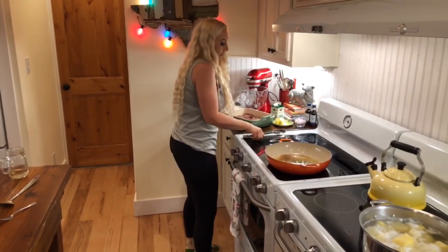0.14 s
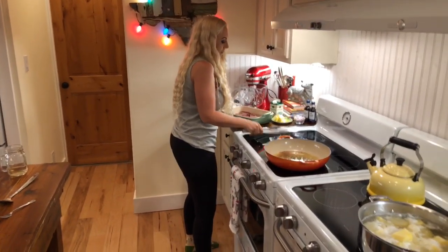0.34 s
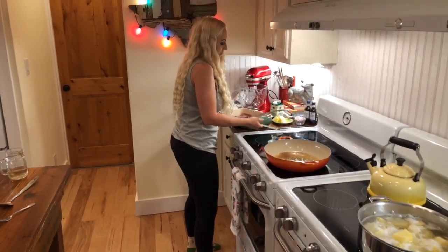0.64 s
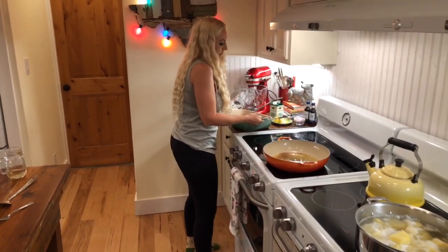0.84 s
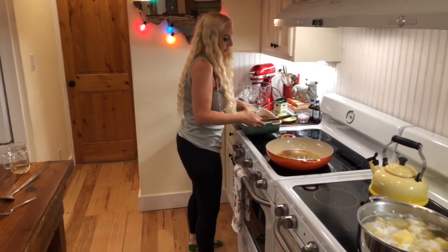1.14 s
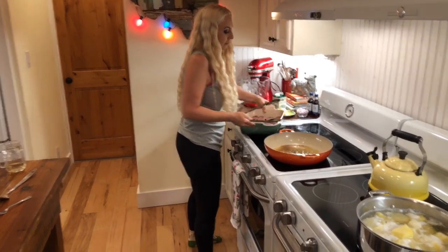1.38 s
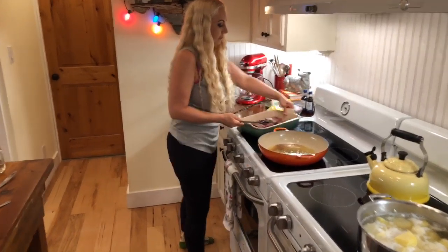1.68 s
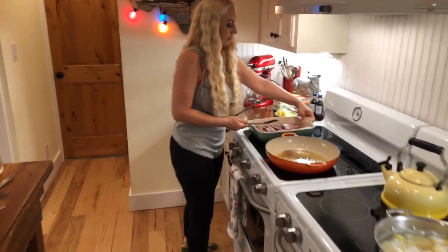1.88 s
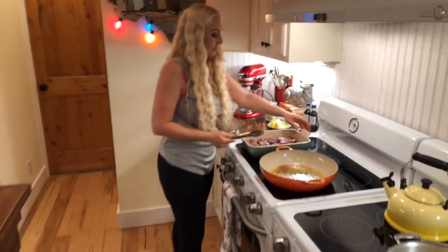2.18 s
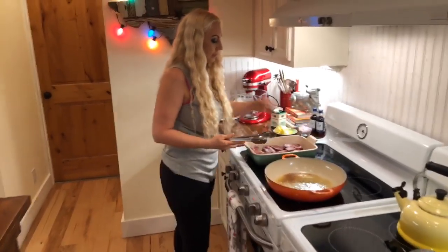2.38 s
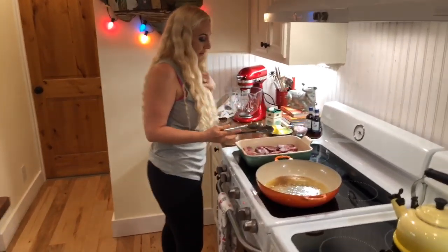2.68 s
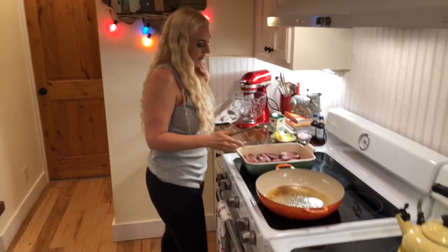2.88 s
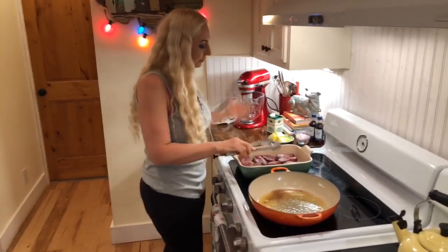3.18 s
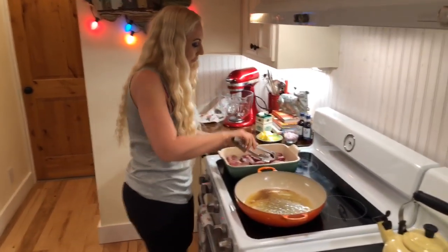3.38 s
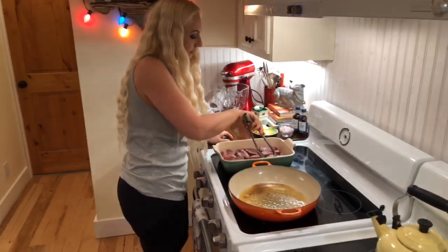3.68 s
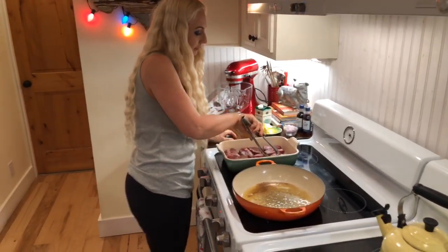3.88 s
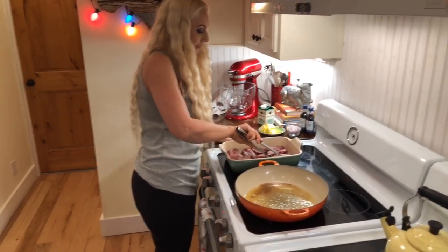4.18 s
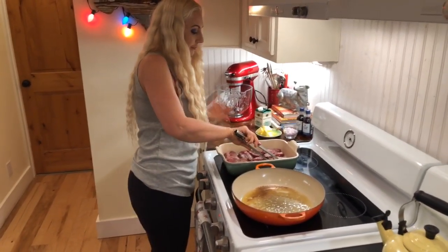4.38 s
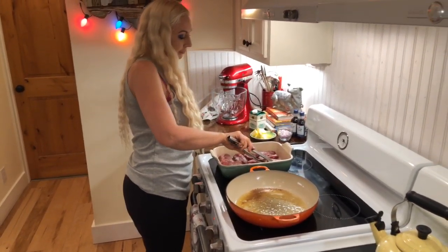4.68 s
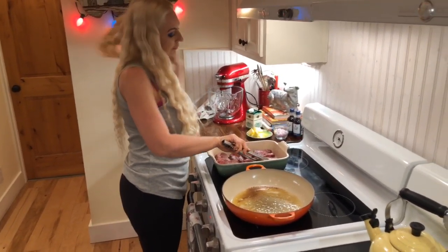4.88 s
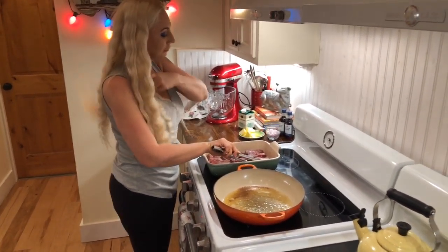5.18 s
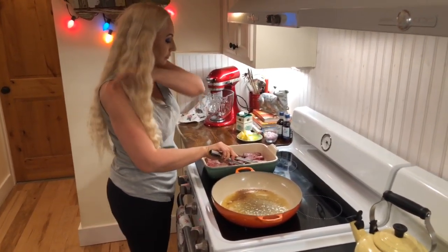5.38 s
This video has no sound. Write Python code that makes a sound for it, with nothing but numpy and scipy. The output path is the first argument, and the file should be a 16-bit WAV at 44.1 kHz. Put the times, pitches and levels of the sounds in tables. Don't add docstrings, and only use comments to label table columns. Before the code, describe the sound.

In a quiet home kitchen with a low hum, steel tongs clatter as they are picked up, a stoneware dish grinds along the counter and knocks down heavily with low thuds. A cup and cutlery chink, then tongs click, spring and snap hard on the dish, followed by faint ticks and rustling. A hand-held microphone catches short indoor echoes and low handling rumble.

```python
import sys
import numpy as np
from scipy import signal
from scipy.fft import rfft, irfft, next_fast_len
from scipy.io import wavfile

SR = 44100
rng = np.random.default_rng(int(sys.argv[2]) if len(sys.argv) > 2 else 0)


def gain_from_db(level_db):
    decades = np.asarray(level_db, float) / 20
    return 10 ** decades


def store_pcm(level_fs):
    pcm = np.round(np.clip(level_fs, -1, 1) * 32767).astype(np.int16)
    wavfile.write(sys.argv[1], SR, np.atleast_2d(pcm).T)


N = 244622

# (time [s], level [dB], crack against ring [dB], favoured pitch [Hz], its level [dB])
TONG_CLICKS = [
    (3.1232, -45, -11, 7300, -5),
    (3.2665, -65.5, -5, 5360, -8),
    (3.4311, -45, -11, 4800, -10.5),
    (3.5917, -47, -8.5, 7060, -1.5),
]
# (pitch [Hz], level [dB], time to fall 60 dB [s])
TONGS = [(4730, -6, .2), (4960, -1, .25), (5790, 0, .3), (7060, -9, .12), (5550, -9, .15), (8200, -11, .2),
         (9170, -12, .12), (9890, -12, .15), (10500, -13, .08), (11220, -13, .08), (11690, -12, .07),
         (12680, -12, .1), (13200, -12, .07), (14550, -15, .08)]
# (frequency [Hz], level [dB per Hz])
STEEL_CRACK = [(1060, -50), (1800, -15), (3060, -8), (3320, -6), (4140, -6.5), (4790, 9.5), (5250, 5.5),
               (5640, 6.5), (6470, -3.5), (7160, 3.5), (7770, -5.5), (8910, -7), (11800, -8), (13100, -13),
               (15500, -17), (16200, -25)]


def tong_clicks():
    return struck(TONG_CLICKS, TONGS, STEEL_CRACK, bright_db=5.5, harder_db=1.0, best_db=-1.5,
                  ring_db=-12.5, spread_db=-1.0, split=0.004, crack_s=0.011, longest_s=0.1,
                  walls_db=-2.0, ring_tilt=0.1)


# (time [s], level [dB], crack against ring [dB], favoured pitch [Hz], its level [dB])
TONG_SPRINGS = [
    (3.3004, -45, -3.5, 4720, -8),
    (3.318, -48.5, -12, 5800, -6),
    (3.3877, -43.5, -1, 9300, -5.5),
    (3.3965, -55.5, -10, 7050, 4),
]
# (pitch [Hz], level [dB], time to fall 60 dB [s])
TONGS_FREE = [(5000, -5.5, .3), (5790, -5, .3), (6990, -7, .25), (7540, -21, 0.19), (8220, -8.5, .3),
              (9168, -14.5, .2), (9870, -10.5, .25), (10530, -12, .1), (10950, -12, .12), (11480, -14, .12),
              (12500, -15, .12), (13100, -13, .1), (14550, -17, 0.097), (15300, -26, 0.1006)]


def tong_springs():
    return struck(TONG_SPRINGS, TONGS_FREE, STEEL_CRACK, bright_db=6.5,
                  ring_db=-11.5, spread_db=0.0, split=0.0045, crack_s=0.0049, longest_s=0.22,
                  walls_db=-0.5, ring_tilt=0.11)


# (time [s], level [dB], crack against ring [dB], favoured pitch [Hz])
TONG_SNAPS = [
    (3.4805, -28.5, -11.5, 5950),
    (3.5244, -49, -3, 5760),
]
# (pitch [Hz], level [dB], time to fall 60 dB [s])
TONGS_GRIPPED = [(4807, 2, 0.24), (5250, -20, 0.31), (5680, -22, 0.19), (5760, -8, 0.21), (6200, -24, 0.24),
                 (6390, -9.5, 0.19), (7060, -25, 0.39), (8230, -13, 0.1), (9076, -22, 0.43),
                 (10060, -7, 0.0378), (11300, -13, 0.1), (12220, -15, 0.25), (12360, -13, 0.12),
                 (13610, -16.5, 0.18)]


def tong_snaps():
    return struck(TONG_SNAPS, TONGS_GRIPPED, STEEL_CRACK, bright_db=3.0, best_db=-3,
                  ring_db=-15.5, spread_db=3.5, split=0.0024, crack_s=0.0056, longest_s=0.072,
                  walls_db=-0.5, ring_tilt=0.05)


# (time [s], level [dB], crack against ring [dB], favoured pitch [Hz])
JAW_ON_RIM = [
    (3.48, -41.5, -2.5, 2038),
]
JAW_REBOUND = [
    (3.592, -44.5, -6, 856),
]
# (pitch [Hz], level [dB], time to fall 60 dB [s])
RIM_STRUCK = [(622, -19, .2), (891, -3.5, 0.093), (1093, -9, .12), (1578, -2, .12), (1940, -8, .04),
              (2050, -3.5, 0.051), (2200, -11.5, .1), (2420, -3, 0.099), (2573, -22, 0.14),
              (2772, -20, .15)]
RIM_REBOUND = [(818, -6, 0.15), (874, -3, .16), (1187, -7.5, 0.19), (1340, -7, 0.12), (1693, -4, .12),
               (1830, -16, .15), (2030, -9, .12), (2300, -10, 0.13), (2760, -28, .1), (2900, -29, .1)]
# (frequency [Hz], level [dB per Hz])
JAW_CRACK = [(300, -39.5), (620, -22), (850, 4), (1300, -2.5), (2070, 0.5), (2600, -11), (4000, -16),
             (6000, -59)]


def jaw_on_rim():
    return sum(struck(taps, rim, JAW_CRACK, bright_db=-1.0, best_db=-7.5,
                      ring_db=-11.0, spread_db=3.0, split=0.011, crack_s=0.0058, longest_s=0.16,
                      walls_db=0.5)
               for taps, rim in ((JAW_ON_RIM, RIM_STRUCK), (JAW_REBOUND, RIM_REBOUND)))


# (time [s], level [dB], crack against ring [dB], favoured pitch [Hz], its level [dB])
TONG_TICKS = [
    (3.8008, -68, -7, 5700, -8),
    (3.925, -68.5, -2.5, 4800, -15),
    (3.982, -64, -9, 4970, -8),
    (3.9883, -58.5, -1, 5160, -9),
    (4.127, -73, -4, 5250, -5),
    (4.268, -69, -9, 5200, -1),
    (4.3245, -52.5, -9.5, 5500, 0),
]
# (pitch [Hz], level [dB], time to fall 60 dB [s])
TONGS_DAMPED = [(4820, -8, 0.19), (5240, -7, 0.096), (5600, -6, 0.096), (5981, -23, 5.0), (6880, -21, 0.17),
                (7682, -31, 5.0), (9400, -20, 0.12), (10560, -14, 0.074)]


def tong_ticks():
    return struck(TONG_TICKS, TONGS_DAMPED, STEEL_CRACK, bright_db=0.0,
                  ring_db=-17, spread_db=2.5, split=0.0037, crack_s=0.0039, longest_s=0.085,
                  walls_db=-1, ring_tilt=0.1)


# (time [s], level [dB], crack against ring [dB], favoured pitch [Hz])
TONG_PICKUP = [
    (0.2264, -68, -15, 5340),
    (0.2483, -54, -7, 6660),
    (0.3257, -62, -24, 4670),
    (0.3785, -47, -2, 5240),
    (0.3914, -49, -4, 4860),
    (0.3995, -46, -10, 5330),
    (0.4494, -55, -23, 8450),
]
# (pitch [Hz], level [dB], time to fall 60 dB [s])
TONGS_LYING = [(4748, -4, 0.24), (5000, 3, 0.34), (5320, -6, 0.2), (6460, -9, 0.86), (6800, -24, 0.47),
               (7470, -15, 0.19), (8500, -6, 0.93), (8600, -19, 0.23), (9700, -6, 0.3), (10300, -14, 0.17),
               (10500, -4, 0.1), (11220, -12, 0.18), (12880, -13, 0.19), (13370, -13, 0.2)]


def tong_pickup():
    return struck(TONG_PICKUP, TONGS_LYING, STEEL_CRACK, bright_db=10.0, best_db=-3.5,
                  ring_db=-17.5, spread_db=1.5, split=0.0023, crack_s=0.0064, longest_s=0.16,
                  walls_db=2.1, ring_tilt=0.1)


# (peak time [s], level [dB], rise [s], fall [s])
STEEL_SLIDE = [
    (0.272, -50.5, 0.039, 0.037),
    (0.345, -56.5, 0.071, .08),
    (0.4, -54, 0.063, 0.097),
]
# (frequency [Hz], level [dB per Hz])
SLIDE_COLOUR = [(880, -59.5), (1500, -28.5), (1670, -1.5), (2230, -18), (2560, 0), (2770, -8.5),
                (4000, -6.5), (4870, 1.5), (6120, -8.5), (7170, -11), (7760, -11), (10900, -17),
                (16000, -21)]


def steel_slide():
    ticks = rng.standard_normal(N) * gain_from_db(4.9 * flicker(350))
    return gain_from_db(-6.5) * strokes(STEEL_SLIDE) * rms_one(shaped(ticks, SLIDE_COLOUR))


# (time [s], level [dB], crack against ring [dB], favoured pitch [Hz], its level [dB])
DISH_KNOCKS = [
    (1.502, -46, 4.5, 700, -16),
    (1.6137, -36.5, 8, 787, 6),
    (1.6758, -30, 1.5, 1196, -7.5),
    (1.7914, -32.5, 3, 2894, -2),
]
# (pitch [Hz], level [dB], time to fall 60 dB [s])
DISH = [(563, -29.5, 5.0), (838, 2, 0.33), (1110, 8, 0.24), (1250, -9, 0.12), (1530, -15, 1.4),
        (1860, -12, 0.26), (2226, -12, 0.1), (2470, -12, 0.16), (2670, 2.5, 0.14), (3170, -23.5, 1.1),
        (3386, -14.5, 0.52), (3380, 6, 0.028), (3420, -8, 0.19), (4240, 7, 0.0245)]
DISH_ROCKING = [(380, -12, 1.4), (656, -25.5, 0.23), (867, -4.5, 0.18), (1140, -4, 0.206),
                (1235, -22.5, 1.1), (1670, -6, 0.048), (2320, -22, 0.45), (2470, -24, 5.0),
                (2643, -14.5, 0.51), (2880, -24.5, 0.32), (3040, -11.5, 0.4), (3250, -27, 1.5),
                (3690, -28, 0.28), (4340, -29.5, 0.28)]
DISH_FLAT = [(410, 1, 0.66), (473, -20, 0.65), (562, 1, 0.35), (858, -4.5, 0.79), (1112, -2.5, 0.17),
             (1322, -4.5, 0.29), (1669, -13.5, 0.25), (1880, -21, 5.0), (2700, -19.5, 0.15),
             (2480, -6.5, 0.13), (2826, -18, 0.5), (2923, -22, 1.0), (3320, -7, 0.28), (4300, -26, 0.34)]
# (frequency [Hz], level [dB per Hz])
DISH_CRACK = [(76, -20.5), (150, -1.5), (270, -9.5), (881, -2.5), (1140, -2), (2090, -9.5), (2610, -6.5),
              (4070, -11.5), (12800, -36.5), (15100, -43.5), (16000, -72)]


def dish_knocks():
    landings = ((DISH_KNOCKS[:2], DISH), (DISH_KNOCKS[2:3], DISH_ROCKING), (DISH_KNOCKS[3:], DISH_FLAT))
    return sum(struck(knocks, dish, DISH_CRACK, bright_db=-3.0, harder_db=0.33,
                      ring_db=-18.5, spread_db=2.0, split=0.008, crack_s=0.0074, longest_s=0.22,
                      walls_db=-2.1, ring_tilt=0.088)
               for knocks, dish in landings)


# (time [s], level [dB], crack against ring [dB], favoured pitch [Hz])
RIM_TAPS = [
    (0.272, -56.5, 1.5, 452),
    (0.387, -54.5, -7, 2690),
    (2.061, -63, 7.5, 720),
    (3.985, -69.5, -0.5, 2300),
    (4.324, -65.5, 0, 2050),
]
DULL_BUMPS = [
    (0.79, -60, -14, 870),
    (0.895, -57, -7, 860),
    (1.0, -57, -10, 1550),
    (1.02, -56, -15, 860),
    (1.055, -57, -18, 866),
    (1.131, -52, -10.5, 794),
    (1.434, -62, -2, 765),
]
# (pitch [Hz], level [dB], time to fall 60 dB [s])
RIM = [(617, -4.5, 0.15), (634, -42, 0.67), (860, -9, 0.17), (877, -4.5, 0.21), (1180, -20, 0.25),
       (1180, -3.5, 0.36), (1708, -4.5, 0.28), (2050, 1, 0.12), (2270, 6, 0.2), (2700, -33, 0.17)]
# (frequency [Hz], level [dB per Hz])
RIM_CRACK = [(180, -34), (300, -6), (648, -14), (831, 3), (978, 0.5), (2070, -6), (4000, -16.5),
             (5200, -71), (8800, -120)]


def rim_taps():
    return sum(struck(taps, RIM, RIM_CRACK, bright_db=bright_db, best_db=best_db,
                      ring_db=-29.0, spread_db=6.5, split=0.02, crack_s=0.0068, longest_s=0.3,
                      walls_db=-0.2)
               for taps, bright_db, best_db in ((RIM_TAPS, 2.1, -2.0), (DULL_BUMPS, -4, -3.5)))


# (time [s], level [dB])
DRAG = [
    (0.121, -80.5),
    (0.27, -67),
    (0.304, -60.5),
    (0.43, -72),
    (0.76, -65),
    (0.87, -65),
    (1.04, -61.5),
    (1.13, -79.5),
    (1.28, -88.5),
]
# (peak time [s], level [dB], rise [s], fall [s])
SETTLING = [
    (1.53, -59, 0.036, 0.79),
]
# (frequency [Hz], level [dB per Hz])
DRAG_COLOUR = [(47, -45.5), (80, 2.5), (177, -6.5), (358, -2.5), (535, -5), (837, -5), (1290, -11.5),
               (1580, -13), (2330, -25), (2500, -34), (3250, -60), (5500, -120)]
GRIT_COLOUR = [(900, -19.5), (1500, -4.5), (2500, -3), (4500, -11), (7000, -20.5)]


def drag():
    lumps = gain_from_db(2 * flicker(25) + 2.5 * flicker(150))
    grind = coloured(DRAG_COLOUR) * lumps
    body = sum(gain_from_db(level_db) * ring(grind, hz, 0.3) for hz, level_db, _ in RIM)
    grind = rms_one(rms_one(grind) + gain_from_db(-18.0) * rms_one(body))
    s, grind_db = np.transpose(DRAG)
    grit_db = -76.5 + 0.92 * (grind_db + 59.5)
    grit_gain = envelope(np.c_[s, grit_db]) + strokes(SETTLING)
    grit = grit_gain * coloured(GRIT_COLOUR) * lumps
    return gain_from_db(-4.0) * (envelope(DRAG) * grind + grit)


# (time [s], level [dB], crack against ring [dB], favoured pitch [Hz])
CUTLERY_CLICKS = [
    (2.2646, -42, -10.5, 3430),
    (2.2685, -41.5, -11, 8500),
    (2.2855, -56, -13, 5950),
    (2.377, -56, -2, 5800),
    (2.4967, -60, -2.5, 3330),
]
# (pitch [Hz], level [dB], time to fall 60 dB [s])
CUTLERY = [(4743, -9, .2), (4950, -5, .14), (5800, -3, .11), (6406, -4, .096), (8500, -4, .15),
           (7200, -7, .1), (9475, -4, .13), (10380, -8, .2), (10520, -3, .15), (11560, -3, .09),
           (11900, -14, .2), (5300, -11, .1), (13040, -9, .19), (13450, -9, .13)]
# (frequency [Hz], level [dB per Hz])
CUTLERY_CRACK = [(1060, -49), (1800, -29), (2300, -13), (3260, -16.5), (4100, -17), (4830, 3.5), (5290, -6),
                 (5850, -3), (7910, -8.5), (8280, -11.5), (10800, -10), (13400, -9.5), (16000, -29)]


def cutlery():
    return struck(CUTLERY_CLICKS, CUTLERY, CUTLERY_CRACK, bright_db=3.0, harder_db=0.56, best_db=-20,
                  ring_db=-19.5, spread_db=3.5, split=0.0048, crack_s=0.0036, longest_s=0.13,
                  walls_db=1.0, ring_tilt=0.14)


# (time [s], level [dB], crack against ring [dB], favoured pitch [Hz])
CUP_CHINK = [
    (2.0612, -46, -10.5, 4200),
]
# (pitch [Hz], level [dB], time to fall 60 dB [s])
CUP = [(4830, -21, 0.33), (3880, -11, 0.21), (4730, -23, 1.4), (5792, -23, 0.94), (6120, 0, 0.13),
       (6240, -25, 0.23), (7500, -18, 0.32), (9800, -28, 0.7)]
# (frequency [Hz], level [dB per Hz])
CUP_CRACK = [(1760, -39), (3000, -37), (4170, -3), (5110, -8), (6220, -7), (6440, -10), (8460, -24.5),
             (13100, -23), (16000, -53)]


def cup():
    return struck(CUP_CHINK, CUP, CUP_CRACK, bright_db=4.5, best_db=-15,
                  ring_db=-15.5, spread_db=-7.5, split=0.0076, crack_s=0.0082, longest_s=0.15,
                  walls_db=-1.0)


# (time [s], level [dB], crack against ring [dB], favoured pitch [Hz])
LIGHT_TAPS = [
    (4.999, -49.5, -1.4, 850),
]
# (pitch [Hz], level [dB], time to fall 60 dB [s])
TAPPED_LID = [(791, -1.5, .1), (1115, -7, .13), (1590, -8, .1), (2210, -4, .15), (3000, -10, .08),
              (4090, -8, .04), (4800, -12, .15), (5060, -11, .08)]
# (frequency [Hz], level [dB per Hz])
TAP_CRACK = [(240, -29), (400, -23), (1080, -5.5), (1880, -11), (2920, -9), (4490, -21), (5150, -9.5),
             (8670, -18.5), (12300, -26), (15500, -31)]


def lid_tap():
    return struck(LIGHT_TAPS, TAPPED_LID, TAP_CRACK, bright_db=-2.0, best_db=-8.5,
                  ring_db=-14.5, spread_db=2.0, split=0.0099, crack_s=0.0051, longest_s=0.098,
                  walls_db=-3.5, ring_tilt=0.1)


# (time [s], level [dB], crack against ring [dB], favoured pitch [Hz])
FLOOR_THUDS = [(0.099, -57, -16, 442), (0.528, -63, -26, 101), (1.048, -50, -17, 81.1),
               (1.434, -46.5, -6.5, 192), (1.503, -48, 2.5, 170), (1.555, -54.5, 2, 176.2),
               (1.616, -34.5, -18, 168), (1.677, -31.5, -19, 165), (1.794, -34.5, -19.5, 115),
               (1.806, -34, -13, 162), (2.462, -55, -15, 313), (2.486, -54.5, -16.5, 297),
               (5.477, -60.5, -10, 280)]
# (pitch [Hz], level [dB], time to fall 60 dB [s])
BOARDS = [(81.9, -7.5, 0.15), (160, -1, 0.126), (200.3, -10, 0.28), (320, -6, 0.2), (450, -8.5, 0.053)]
# (frequency [Hz], level [dB per Hz])
THUD_CRACK = [(60, -20), (110, -5.5), (165, 1.5), (300, -13.5), (900, -15.5), (1600, -36.5)]


def floor_thuds():
    return struck(FLOOR_THUDS, BOARDS, THUD_CRACK, bright_db=-0.7, best_db=-4.0,
                  ring_db=-18.5, spread_db=3, split=0.008, crack_s=0.017, longest_s=0.26, walls_db=-2)


# (peak time [s], level [dB], rise [s], fall [s])
RUSTLES = [
    (0.098, -71.5, 0.012, 0.031),
    (1.17, -70.5, 0.049, 0.022),
    (1.515, -66, 0.0098, 0.97),
    (2.499, -65, 0.041, 0.21),
    (2.906, -70, 0.22, 0.055),
    (4.02, -74, 0.013, 0.33),
    (4.23, -73, 0.042, 0.49),
    (4.596, -76, 0.16, 0.17),
    (5.286, -82, .04, .05),
]
# (frequency [Hz], level [dB per Hz])
RUSTLE_COLOUR = [(710, -6.5), (1200, -1), (1410, -8.5), (1540, -2.5), (3870, -2), (12700, -8), (14800, -18),
                 (16000, -17)]


def rustles():
    grain = coloured(RUSTLE_COLOUR) * gain_from_db(1.02 * flicker(80))
    return gain_from_db(-6.5) * strokes(RUSTLES) * rms_one(grain)


# (start time [s], length [s], pitch [Hz], level [dB], overtone fall [dB])
SQUEAKS = [
    (4.232, .075, 1700, -80, 0),
    (4.448, .09, 3050, -85.5, -30),
    (4.45, .03, 2720, -82, -30),
]


def squeaks():
    out, t = np.zeros(N), np.arange(N) / SR
    waver = 1 + 0.03 * flicker(900) + 0.02 * flicker(40)
    for start, length, hz, level_db, fall_db in SQUEAKS:
        swell = np.sin(np.pi * np.sqrt(np.clip((t - start) / length, 0, 1)))
        phase = 2 * np.pi * np.cumsum(hz * waver) / SR
        tone = np.sin(phase) + gain_from_db(fall_db) * np.sin(2 * phase)
        out += gain_from_db(level_db) * swell * tone
    return out * gain_from_db(3 * flicker(300))


# (frequency [Hz], time to fall 60 dB [s])
KITCHEN = [(60, 1), (130, 0.36), (500, 0.62), (2000, 0.42), (6000, 0.48), (14000, 0.23)]


def kitchen(near, sent):
    size = SR // 2 + 4096
    t, tail = np.arange(size) / SR, np.zeros((2, size))
    white = rng.standard_normal((2, 2, size))
    for k, low in enumerate(45 * 2 ** np.arange(8.5)):
        sos = signal.butter(2, [low, min(2 * low, 0.45 * SR)], "band", fs=SR, output="sos")
        tail += signal.sosfilt(sos, white[k % 2]) * gain_from_db(-60 * t / at_hz(KITCHEN, np.sqrt(2) * low))
    early = rng.standard_normal((2, size)) * gain_from_db(-60 * t / 0.11)
    early_db = np.array([[-3.5], [-1.5]])
    onset = np.clip(t / 0.0074, 0, 1)
    echoes = onset * (gain_from_db(-2.5) * rms_one(tail) + gain_from_db(early_db) * rms_one(early)) / np.sqrt(size)
    mid, side = signal.fftconvolve(sent[None], echoes, axes=1)[:, :N]
    return near + mid, gain_from_db(-5.5) * side


# (frequency [Hz], level [dB per Hz])
AIR = [(24, -29.5), (40, 0), (86, -2.5), (148, -13.5), (302, -14.5), (406, -18), (633, -17.5), (716, -21),
       (1830, -29.5), (2400, -30), (4550, -38), (6590, -38.5), (14500, -42)]


def air():
    return gain_from_db(-70.5 + 0.37 * flicker(3.43)) * np.array([coloured(AIR), gain_from_db(-5.0) * coloured(AIR)])


# (time [s], level [dB])
SWAY = [(0.0, -54), (0.23, -58), (0.482, -40.5), (0.938, -50.5), (1.143, -43), (1.539, -48), (1.68, -42.5),
        (2.092, -51), (2.328, -50.5), (3.72, -66), (4.55, -67)]
# (frequency [Hz], level [dB per Hz])
SWAY_COLOUR = [(3, -6), (8, 6), (16, -6), (30, -14.5), (60, -35.5)]


def sway():
    tremor = gain_from_db(-53.5 - 1.47 * np.arange(N) / SR)
    jolt_rise_s, jolt_fall_s = 0.33, 0.14
    gain = tremor + strokes([(s, db, jolt_rise_s, jolt_fall_s) for s, db in SWAY])
    return gain * np.array([coloured(SWAY_COLOUR), gain_from_db(-16.0) * coloured(SWAY_COLOUR)])


def struck(blows, modes, crack, bright_db, ring_db, spread_db, split, crack_s, longest_s, walls_db,
           harder_db=0, best_db=None, ring_tilt=1):
    size = 8192
    out, t = np.zeros((2, N + size)), np.arange(size) / SR
    hz, level_db, t60 = np.repeat(np.transpose(modes), 2, axis=1)
    centre_hz = np.exp(np.mean(np.log(hz)))
    flutter = np.clip(1 - abs(t / 0.008 - np.arange(24)[:, None]), 0, 1) * 3 * np.log(10) / 20
    fall = np.log(1000) / np.append(np.minimum(t60, longest_s), longest_s / 4)
    to_walls = np.array([[0], [-7.5]])
    for s, peak_db, crack_db, best_hz, *own_db in blows:
        tilt_db = bright_db + harder_db * (peak_db + 45.5)
        detune, strength = rng.standard_normal((2, len(hz)))
        pitch = np.append(hz * (1 + split * detune), best_hz)
        mode_db = ring_db + level_db + ring_tilt * tilt_db * np.log2(hz / centre_hz) + spread_db * strength
        gain = gain_from_db(np.append(mode_db, own_db or [best_db]))
        waver = rng.standard_normal((len(pitch), len(flutter))) @ flutter
        fading = np.exp(waver - np.outer(fall, t))
        rings = gain @ (fading * np.sin(2 * np.pi * np.outer(pitch, t)))
        rings *= np.sin(np.pi / 2 * np.clip(t / (0.0455 * crack_s), 0, 1)) ** 2
        tilted = [(f, db + tilt_db * np.log2(max(f, hz.min()) / centre_hz)) for f, db in crack]
        chatter = rng.standard_normal(size) * np.exp(-(t / crack_s) ** 0.53)
        chatter *= np.clip(t / (0.054 * crack_s), 0, 1)
        energy = np.sqrt(crack_s * SR / size / 2)
        burst = energy * rms_one(shaped(chatter, tilted))
        pulse = energy * rms_one(shaped(t == 0, tilted))
        i = round(s * SR)
        out[:, i:i + size] += gain_from_db(peak_db) * (rings * gain_from_db(to_walls) + gain_from_db(crack_db) * np.array([burst, pulse]))
    return out[:, :N] * gain_from_db(np.array([[0], [walls_db]]))


def ring(push, hz, t60):
    r, w = gain_from_db(-60 / (t60 * SR)), 2 * np.pi * hz / SR
    return signal.lfilter([0, np.sin(w)], [1, -2 * r * np.cos(w), r * r], push)


def strokes(rows):
    return sum(envelope([(s - rise, db - 30), (s, db), (s + fall, db - 30)]) for s, db, rise, fall in rows)


def envelope(rows):
    s, level_db = np.transpose(rows)
    return gain_from_db(np.interp(np.arange(N) / SR, s, level_db, left=-150, right=-150))


def flicker(rate):
    knots = rng.standard_normal(4000)
    return np.interp(np.arange(N) * rate / SR, np.arange(4000), knots)


def coloured(spectrum):
    return rms_one(shaped(rng.standard_normal(N), spectrum))


def shaped(x, spectrum):
    length, x = len(x), np.resize(x, next_fast_len(len(x)))
    hz = np.arange(len(x) // 2 + 1) * SR / len(x)
    outside_db = -40 * ((hz < spectrum[0][0]) | (hz > spectrum[-1][0]))
    cepstrum = irfft(np.log(gain_from_db(at_hz(spectrum, hz) + outside_db)), len(x))
    cepstrum[1:len(x) // 2] *= 2
    cepstrum[len(x) // 2 + 1:] = 0
    return irfft(rfft(x) * np.exp(rfft(cepstrum)), len(x))[:length]


def at_hz(points, hz):
    table_hz, value = np.transpose(points)
    return np.interp(np.log(hz + 0.00083), np.log(table_hz), value)


def rms_one(x):
    return x / np.sqrt(np.mean(x ** 2) + 1e-30)


# (frequency [Hz], level of left minus right [dB])
SIDE_PICKUP = [(30, -6), (70, 4.5), (150, -5.5), (350, -4), (2000, -1), (9000, 1), (11500, -1),
               (14500, -9.5)]


def scene():
    contacts = tong_clicks() + tong_springs() + tong_snaps() + jaw_on_rim() + tong_ticks() + tong_pickup()
    contacts += dish_knocks() + rim_taps() + cutlery() + cup() + lid_tap() + floor_thuds()
    contacts += steel_slide() + drag() + rustles() + squeaks()
    near, sent = contacts
    mid, side = kitchen(near, sent) + air() + sway()
    side = shaped(side, [(4.2, 0.0028)] + SIDE_PICKUP + [(SR / 2, -40)])
    side += 0.051 * mid
    return np.array([mid + side, mid - side])


def roll_off(x):
    return signal.sosfilt(signal.butter(12, 16300, fs=SR, output="sos"), x)


def record(dry):
    return roll_off(dry)


dry = scene()
out = record(dry)
store_pcm(out)
```